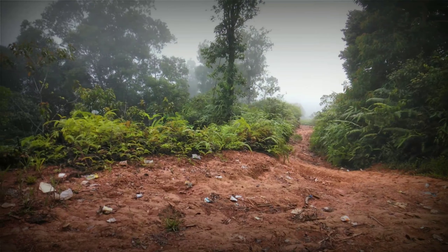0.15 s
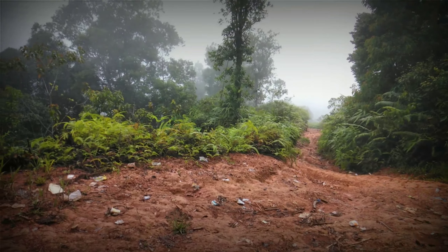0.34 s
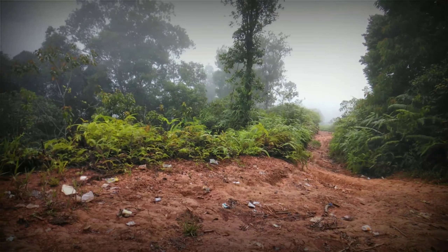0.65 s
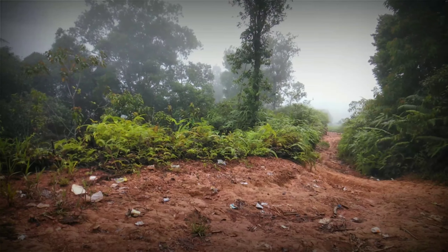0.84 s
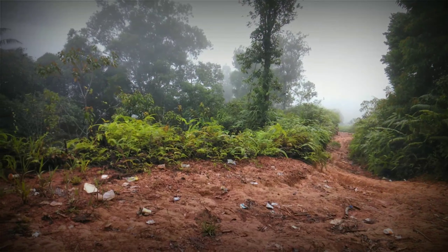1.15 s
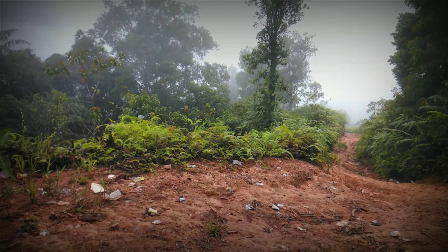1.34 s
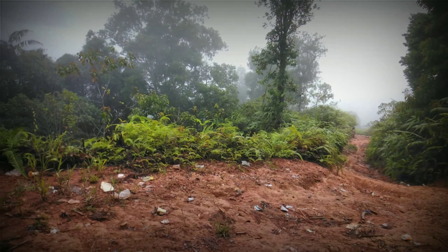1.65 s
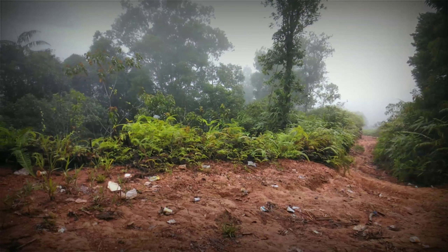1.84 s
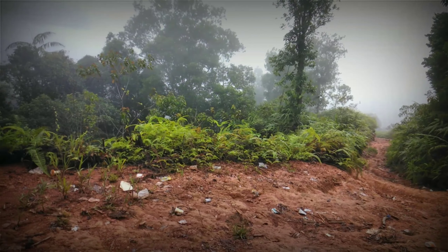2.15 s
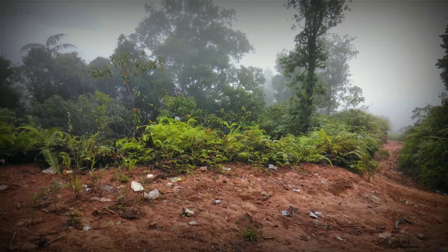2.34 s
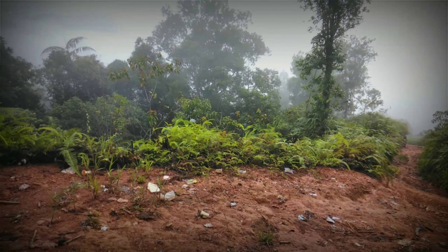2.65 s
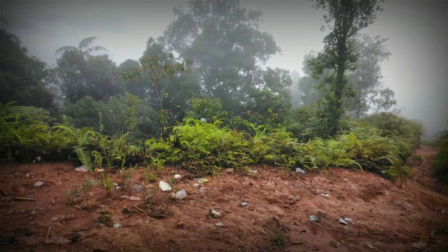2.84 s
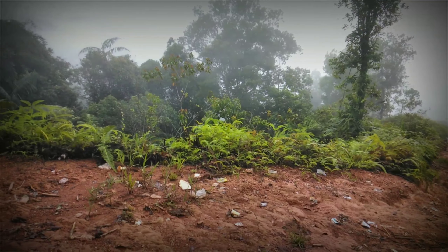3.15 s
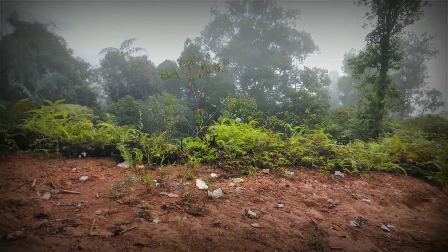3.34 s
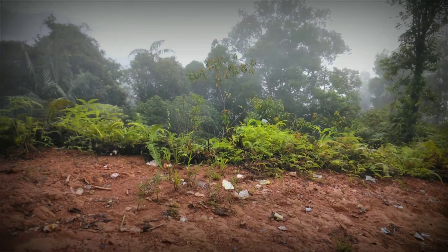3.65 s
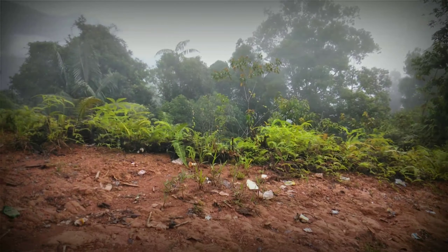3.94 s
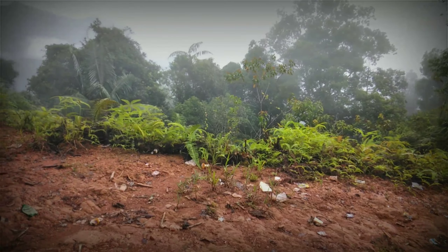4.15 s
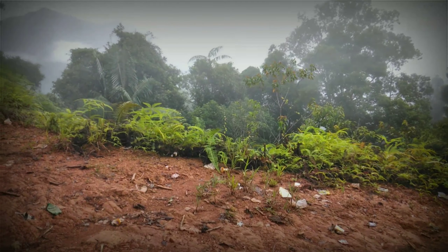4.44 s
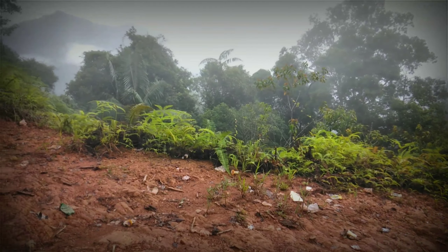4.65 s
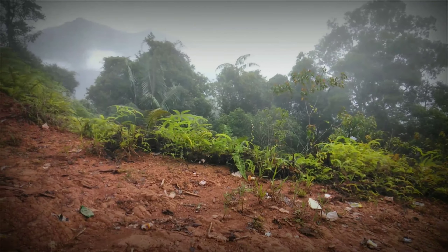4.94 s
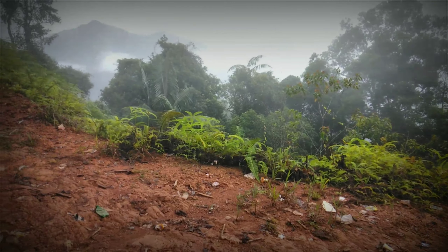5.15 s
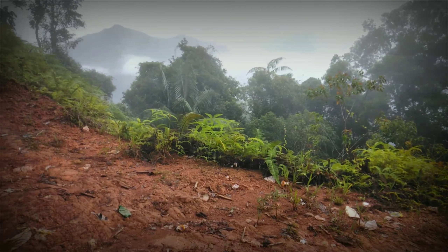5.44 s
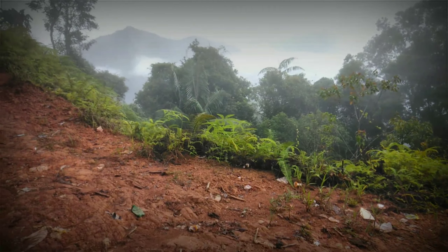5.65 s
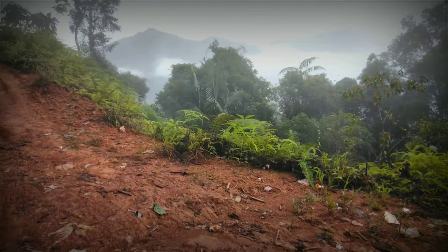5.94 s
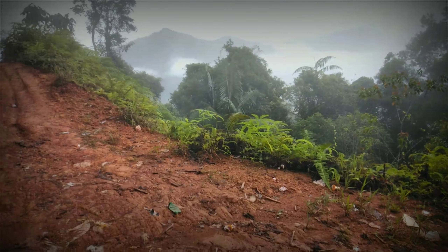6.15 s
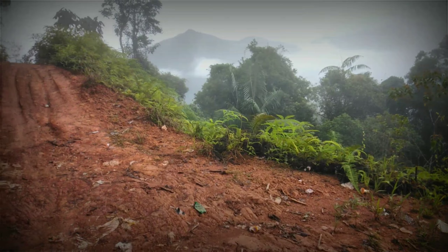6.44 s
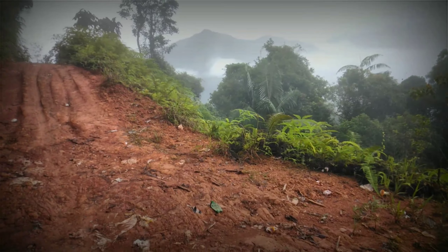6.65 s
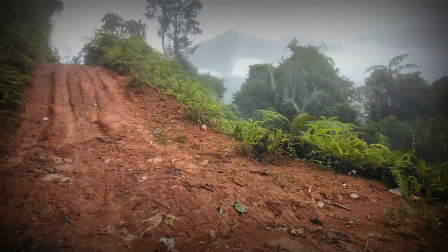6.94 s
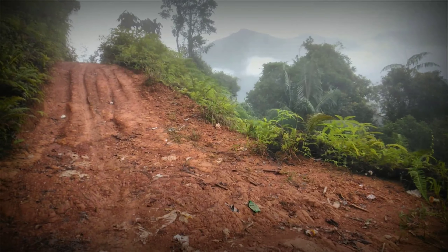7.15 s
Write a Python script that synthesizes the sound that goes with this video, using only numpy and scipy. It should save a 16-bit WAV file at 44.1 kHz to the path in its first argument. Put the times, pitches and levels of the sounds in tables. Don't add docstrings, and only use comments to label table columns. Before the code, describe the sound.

A misty tropical clearing, heard through a slowly turning microphone. Throughout, soft wind and low valley air lie under a dense high insect hiss, with faint shuffling of feet and clothes. One cricket gives paired chirps falling from about 4.2 kHz, nearly five calls a second; another trills near 6.7 kHz, growing strongest around 5 s. A katydid's double clicks near 15 kHz, about 26 a second, start faint, strengthen by 1.2 s and stand out from 5 s. A leaf brushes at 0.1 s; drops tick dully on soil and brightly on leaves. A distant, echoing bird whistles upward at 1.0-1.4 s. Thin breathy calls rise at 2.8 and 3.3 s. At 5.5 s a nearer bird peeps, with low answers to 5.85 s. Gravel crunches at 5.6 s and, longer, 6.5 s, with stone cracks. The wheezy call returns at 7.1 s, cut off at 7.3 s.

```python
import sys
import numpy as np
from scipy import signal
from scipy.fft import rfft, irfft, next_fast_len
from scipy.io import wavfile

SR = 44100
rng = np.random.default_rng(int(sys.argv[2]) if len(sys.argv) > 2 else 0)


def persist_wave(psi):
    counts = np.round(np.clip(psi, -1, 1) * 32767).astype(np.int16)
    wavfile.write(sys.argv[1], SR, np.atleast_2d(counts).T)


def to_linear_factor(level_db):
    exponent = np.asarray(level_db, float) / 20
    return 10 ** exponent


N = 321481
TIME = np.arange(N) / SR


def rms_one(x):
    return x / np.sqrt(np.mean(x ** 2) + 1e-20)


def colour(x, spectrum):
    size = next_fast_len(N)
    hz = np.fft.rfftfreq(size, 1 / SR) + 1e-3
    at_hz, db = np.transpose(spectrum)
    gain_db = np.interp(np.log(hz), np.log(at_hz), db, -99, -99)
    return irfft(rfft(x, size) * to_linear_factor(gain_db), size)[:N]


def halves(x):
    split_hz = 14000
    low = colour(x, [(20, 0), (split_hz - 400, 0), (split_hz + 600, -20)])
    return low, x - low


def drift(hz):
    r = np.exp(-2 * np.pi * hz / SR)
    noise = rng.standard_normal(N + SR)
    return rms_one(signal.lfilter([1], [1, -2 * r, r * r], noise)[SR:])


def level_at(rows, s):
    return np.interp(s, *np.transpose(rows))


def envelope(rows):
    rows = np.array(rows)
    return to_linear_factor(np.interp(TIME, rows[:, 0], rows[:, -1], -140, -140))


def add(out, s, piece):
    i = round(s * SR)
    out[max(i, 0):i + len(piece)] += piece[max(-i, 0):max(N - i, 0)]


def every(anchors, count):
    s, db = np.transpose(anchors)
    k = np.arange(count * len(s)) / count
    times = np.interp(k, np.arange(len(s) + 1), np.append(s, 2 * s[-1] - s[-2]))
    return times, np.interp(times, s, db)


def glide(rows):
    s, hz, db = np.transpose(rows)
    t = np.arange(s[0], s[-1], 1 / SR)
    phase = 2 * np.pi * np.cumsum(np.interp(t, s, hz)) / SR
    return np.sqrt(2) * to_linear_factor(np.interp(t, s, db)) * np.sin(phase)


def forest(x, t60, wet_db):
    t = np.arange(round(.8 * SR)) / SR
    tail = rng.standard_normal(len(t)) ** 3 * to_linear_factor(-60 * t / t60) * (t > .004)
    return x + to_linear_factor(wet_db) * signal.fftconvolve(x, tail / np.sqrt(np.sum(tail ** 2)))[:N]


def choir(spectrum, per_s, size_db, flicker_db):
    struck = rng.random(N) < per_s / SR
    sizes = to_linear_factor(size_db * np.minimum(rng.exponential(1, N), 4))
    strokes = struck * sizes * rng.standard_normal(N)
    return rms_one(colour(strokes, spectrum) * to_linear_factor(flicker_db * drift(16.7)))


def shifting():
    # start_s, peak_db, dying_s (to fall 10 dB)
    shift_rows = [(0.0, -46, .03), (0.3, -52, .03), (0.34, -52, .07), (0.57, -49, .08), (1.44, -58, .1),
                  (2.11, -58, .1), (2.6, -54, .04), (2.66, -52, .04), (3.02, -56, .2), (3.53, -50, .1),
                  (3.8, -54, .06), (4.69, -55, .1), (5.625, -43, .04), (5.85, -57, .2), (6.52, -51, .15),
                  (6.8, -49, .03)]
    attack_s, fidget_db = .02, -60.5
    db = [peak_db - 10 * np.maximum((s - TIME) / attack_s, (TIME - s) / dying_s)
          for s, peak_db, dying_s in shift_rows]
    return to_linear_factor(np.maximum(np.max(db, axis=0), fidget_db))


def air():
    # hz, db_per_hz
    air_hz_db = [(4, 9), (12, 0), (30, -8), (60, -14.5), (110, -17), (150, -14.5), (210, -21), (260, -27),
                 (700, -30.5), (1200, -29.5), (3000, -33), (5000, -43), (9000, -35.5), (16000, -38.5)]
    shuffle_hz_db = [(130, -19), (300, -1.5), (700, 3.5), (1500, -6.5), (3000, -8.5), (5000, -20)]
    shuffle = choir(shuffle_hz_db, 2500, size_db=1.5, flicker_db=2.0)
    wind = rms_one(colour(rng.standard_normal(N), air_hz_db))
    return to_linear_factor(-45) * wind + to_linear_factor(-1.5) * shifting() * shuffle


def choruses():
    # hz, db_per_hz
    low_hz_db = [(2120, -87), (3600, -18), (4000, -6), (4150, -5), (4260, 0), (4380, -6), (4700, -13),
                 (5000, -43), (6500, -23), (11000, -120)]
    mid_hz_db = [(2880, -57), (5220, -18.5), (5520, -10), (6610, 1.5), (7090, -13), (7220, -18),
                 (7290, -21), (7600, -25), (9880, -71), (16700, -120)]
    high_hz_db = [(10500, -30), (11700, -24), (12500, -15), (13500, -11), (14500, -5), (15200, -1),
                  (16000, 1)]
    buzz_hz_db = [(7700, -18), (7950, -7), (8200, -4), (8290, 0), (8380, -6), (8550, -16)]
    # at_s, level_db
    buzzer_rows = [(0, -65), (.4, -71), (.9, -70), (1.6, -60), (2.9, -57), (3.6, -59), (4.6, -73),
                   (5.1, -75), (6.2, -60), (7.29, -61)]
    hiss_rows = [(0, -39), (.6, -41), (1.5, -38), (2.1, -38), (2.55, -36.5), (3, -39.5), (4, -39.5),
                 (4.6, -41.5), (5.5, -40), (6.5, -38.3), (7.29, -39.5)]
    low_db = -59.2 - .3 * (TIME - TIME.mean())
    low = to_linear_factor(low_db + 2.0) * choir(low_hz_db, 5000, size_db=-0.5, flicker_db=1.8)
    mid = to_linear_factor(2.0 - 45.8) * choir(mid_hz_db, 6000, size_db=-1.0, flicker_db=0.32)
    body, top = halves(choir(high_hz_db, 7000, size_db=1.8, flicker_db=1.0))
    katydids = to_linear_factor(-2.5) * (to_linear_factor(-37.6) * body + envelope(hiss_rows) * top)
    throb = 1 + 0.16 * np.cos(2 * np.pi * 69.0 * TIME)
    buzzer = choir(buzz_hz_db, 9000, size_db=1.5, flicker_db=.3)
    return low + mid + to_linear_factor(-3.5) * envelope(buzzer_rows) * throb * buzzer + katydids


def leaf():
    # at_s, level_db
    rustle_rows = [(.09, -80), (.11, -51), (.15, -52), (.18, -80)]
    hiss = choir([(5000, -15), (8000, 0), (14000, -6)], 5000, size_db=3.5, flicker_db=-2.0)
    return envelope(rustle_rows) * hiss


def taps(table, cycles):
    out, t = np.zeros(N), np.arange(round(.03 * SR)) / SR
    for s, db, hz in table:
        decay = to_linear_factor(db + 8.5 - 60 * t * hz / cycles)
        contact = 1 - np.exp(-2 * t * hz)
        add(out, s, decay * contact * np.sin(2 * np.pi * hz * t))
    return out


def drops():
    # start_s, peak_db, pitch_hz
    soil_rows = [(0.3, -29.5, 810), (0.301, -36, 400), (0.322, -38, 190), (0.329, -45, 694),
                 (0.473, -35, 783), (0.523, -29, 560), (0.554, -35, 923), (0.584, -42, 522),
                 (2.089, -40, 770), (2.442, -45, 703), (2.735, -42, 765), (3.528, -40, 477),
                 (4.588, -42, 660), (4.692, -36, 626), (5.188, -43, 735), (5.874, -36, 836),
                 (5.992, -36.5, 608)]
    leaf_rows = [(0.5797, -40, 1726), (1.3287, -38, 2270), (1.7649, -45, 2480), (2.0323, -36, 2600),
                 (2.4425, -45, 1430), (2.5872, -43, 1900), (2.6254, -46, 1410), (2.6537, -41, 1300),
                 (2.6538, -41, 2250), (3.969, -42, 1400), (4.2822, -43, 2390), (4.5291, -42, 2580),
                 (4.5914, -38, 2450), (4.8548, -38, 1610), (4.8944, -41, 2250), (5.255, -42, 1380),
                 (5.3148, -34.5, 2950), (5.5858, -41, 1340), (5.8027, -43, 2520), (5.992, -37.5, 2740),
                 (6.2418, -41, 1930), (6.6495, -36, 2400), (6.6604, -36, 3000), (6.7057, -39, 2160),
                 (6.732, -38, 3000), (6.739, -37, 2170), (6.7425, -41, 1900), (6.7746, -41, 2300),
                 (6.808, -41, 2160), (6.9347, -45, 2060)]
    return forest(taps(soil_rows, 3.5) + taps(leaf_rows, 7.5), t60=0.092, wet_db=-4)


def stones():
    # start_s, peak_db, pitch_hz
    first_rows = [(5.6143, -36, 1360.0), (5.621, -30, 1610.0), (5.628, -30, 1700.0), (5.6337, -29, 1920.0),
                  (5.6379, -31, 1290.0), (5.643, -26, 2480.0), (5.6468, -32, 2580.0), (5.6515, -31, 4050.0),
                  (5.6567, -37, 2110.0), (5.6623, -28, 2260.0), (5.6693, -31, 2820.0),
                  (5.6738, -36, 2070.0)]
    second_rows = [(6.5145, -32, 2300.0), (6.5238, -34, 2480.0), (6.5307, -32, 2170.0),
                   (6.5357, -34, 2050.0), (6.5417, -31, 1980.0), (6.5473, -35, 2730.0),
                   (6.5532, -36, 2090.0), (6.5582, -32, 1770.0), (6.5638, -36, 2390.0),
                   (6.5694, -36, 1830.0), (6.5743, -34, 2930.0), (6.5918, -35, 1640.0)]
    rows = np.add(first_rows + second_rows, [0, -2.0, 0])
    return forest(taps(rows, 9), t60=0.092, wet_db=-4)


def gravel():
    # start_s, pressing_s, level_db, hollow_share (0-1), lift_off_s
    step_rows = [
        (5.62, .05, -41.5, .27, .014),
        (6.516, .078, -42.5, .42, .05),
    ]
    # hz, db_per_hz
    grit_hz_db = [(300, -29), (700, -2.5), (1700, 1.5), (2600, 2.5), (4500, 1.5), (7500, -4), (9500, -10),
                  (15000, -19)]
    hollow_hz_db = [(1300, -20), (1700, -3), (1850, 0), (2100, -4), (2600, -3), (3400, -14), (4000, -24)]
    attack_s, sag_db, settle_s = .014, -3.5, .05
    grit = choir(grit_hz_db, 8000, size_db=1.5, flicker_db=2)
    hollow = choir(hollow_hz_db, 2500, size_db=2.5, flicker_db=2)
    out = 0
    for s, pressing_s, db, share, lift_off_s in step_rows:
        end, share = s + pressing_s, np.clip(share, 0, 1)
        lifted = end + lift_off_s
        weight = envelope([(s - attack_s, db - 30), (s, db), (end, db + sag_db),
                           (lifted, db - 14), (lifted + settle_s, db - 30)])
        out = out + weight * ((1 - share) * grit + share * hollow)
    return to_linear_factor(6.0) * out


def whistler():
    # start_s, length_s, start_hz, end_hz, level_db
    note_rows = [
        (1.0, 0.015, 2400, 2450, -61),
        (1.034, 0.033, 2450, 2400, -59),
        (1.08, 0.092, 2600, 2733, -53),
        (1.175, 0.045, 2980, 3230, -47),
        (1.21, 0.044, 3200, 3210, -46),
        (1.24, 0.037, 3690, 3677, -45),
        (1.284, .045, 3820, 3700, -51),
        (1.358, 0.038, 3180, 3270, -41),
        (1.39, .03, 3363, 3440, -42.5),
        (1.402, .035, 3240, 3250, -53),
    ]
    out = np.zeros(N)
    for s, length, start_hz, end_hz, db in note_rows:
        add(out, s, glide([(0, start_hz, db - 18), (.006, start_hz, db),
                           (length - .005, end_hz, db), (length, end_hz, db - 18)]))
    husky = 1 + .38 * drift(60)
    return forest(out * husky, t60=.9, wet_db=0)


def wheezer():
    # at_s, pitch_hz, level_db
    call_rows = [
        [(2.78, 7500, -62), (2.81, 7700, -47), (2.845, 7980, -49), (2.92, 7900, -46), (2.97, 8200, -48),
         (3.03, 8400, -46), (3.06, 8700, -54), (3.1, 8800, -64)],
        [(3.27, 7200, -64), (3.32, 7550, -44), (3.36, 7650, -45.5), (3.4, 8020, -45), (3.45, 8250, -49),
         (3.49, 8200, -56), (3.53, 8100, -65)],
        [(7.13, 7200, -64), (7.17, 7550, -47), (7.22, 7750, -50), (7.29, 7940, -49)],
    ]
    out = np.zeros(N)
    for rows in call_rows:
        add(out, rows[0][0], glide(rows))
    breathy = .75 + .6 * drift(240)
    return forest(out * breathy, t60=0.51, wet_db=-9.5)


def peeper():
    # at_s, pitch_hz, level_db
    high_rows = [(5.524, 2790, -68), (5.535, 2820, -56), (5.563, 3070, -55), (5.573, 3100, -70)]
    # start_s, length_s, pitch_hz, level_db
    low_rows = [
        (5.712, .03, 2040, -62),
        (5.765, .032, 2020, -59),
        (5.828, .036, 2050, -56),
    ]
    out = np.zeros(N)
    add(out, high_rows[0][0], glide(high_rows))
    for s, length, hz, db in low_rows:
        add(out, s, glide([(0, hz, db - 15), (length / 4, hz, db),
                           (length * 3 / 4, hz, db), (length, hz, db - 15)]))
    return forest(out, t60=.3, wet_db=-8)


def chirpers():
    # first_s, last_s, period_s, pitch_hz, length_s
    chirper_rows = [(.78, 1.52, .1215, 6850, .03), (1.66, 2.96, .1285, 6830, .03),
                    (3.1, 3.5, .13, 6800, .036), (.04, 1.8, .064, 6970, .028),
                    (5.567, 6.36, .064, 7020, .028), (6.4, 7.28, .064, 7000, .028),
                    (1.72, 3.2, .062, 6560, .022), (2.676, 4.04, .1145, 4850, .013),
                    (2.703, 4.07, .1145, 4850, .013), (6.765, 6.77, .1, 7000, .026),
                    (6.793, 6.82, .021, 7210, .02)]
    chirper_db = [-46, -48, -43, -53, -50, -53, -51, -60, -58.5, -48, -47]
    out = np.zeros(N)
    for (first, last, period, hz, length), db in zip(chirper_rows, chirper_db):
        chirp = glide([(0, hz - 20, -20), (length / 4, hz, 0),
                       (length * 3 / 4, hz, 0), (length, hz - 20, -20)])
        for s, size in zip(np.arange(first, last, period), rng.standard_normal(40)):
            add(out, s - length / 2, to_linear_factor(db + 2 * size) * chirp)
    return forest(out, t60=.2, wet_db=-6)


def triller():
    # start_s, level_db
    trill_rows = [(0.0984, -63), (0.7223, -60), (1.3387, -45), (1.9537, -45.5), (2.5672, -43),
                  (3.1788, -42), (3.7933, -40.5), (4.4103, -37.5), (5.0263, -36.5), (5.6413, -37.5),
                  (6.2627, -40), (6.8834, -42)]
    out, (times, db) = np.zeros(N), every(trill_rows, count=10)
    chance = rng.standard_normal((len(times), 2))
    for s, level_db, own in zip(times, db, chance):
        for lag_s, hz, own_db, size in zip((0, .0133), (6705, 6770), (-2, .5), own):
            pulse = glide([(-.005, hz - 50, -24), (-.002, hz, -1), (.002, hz + 10, 0), (.007, hz - 20, -24)])
            add(out, s + lag_s - .005, to_linear_factor(level_db + own_db + 1.6 * size - 1.5) * pulse)
    return forest(out, t60=.2, wet_db=-8)


def low_cricket():
    # start_s, wait_s (to the next call), level_db
    pair_rows = [(0.003, .205, -41), (0.418, .213, -40), (0.836, .223, -38.5), (1.268, .216, -38),
                 (1.696, .21, -39.5), (2.125, .221, -41), (2.562, .209, -42.5), (2.986, .219, -45.5),
                 (3.414, .216, -47.5), (3.848, .22, -43.5), (4.287, .22, -43.5), (4.719, .209, -46),
                 (5.148, .207, -49.5), (5.567, .216, -48.5), (5.992, .221, -48.5), (6.438, .215, -47),
                 (6.865, .221, -44.5)]
    # at_s, pitch_hz, level_db, lift_share (0-1)
    stroke_rows = [(-.013, 4190, -26, 0), (-.008, 4180, -4, .7), (.001, 4170, 0, 1), (.006, 4135, 0, .75),
                   (.011, 4000, -1, .05), (.015, 3930, 2, 0), (.021, 3830, -1, 0), (.026, 3750, -24, 0)]
    # at_s, lift_db
    lift_rows = [(0, 17), (1.8, 14), (2.3, 13.5), (3.2, 7), (4.1, 9), (5, 6.5), (6.2, 9.5), (7.29, 9.5)]
    out, (at, hz, db, share) = np.zeros(N), np.transpose(stroke_rows)
    first, wait, levels = np.transpose(pair_rows)
    calls = np.sort(np.append(first, first + wait))
    chance = rng.standard_normal((len(calls), 2, 2))
    for s, level_db, strokes in zip(calls, np.interp(calls, first, levels), chance):
        lift_db = level_at(lift_rows, s)
        for lag_s, own_db, (off, size) in zip((0, .042), (0, -.6), strokes):
            stroke = glide(np.transpose([at, hz + 14 * off, db + (share - 1) * lift_db]))
            add(out, s + lag_s + at[0], to_linear_factor(level_db + .7 + own_db + .8 * size) * stroke)
    return forest(out, t60=.3, wet_db=-10)


def katydid():
    # start_s, peak_db
    snap_rows = [(0.0655, -41), (0.4512, -41), (0.8388, -36), (1.2227, -26.5), (1.6067, -26), (1.992, -27),
                 (2.3829, -25), (2.7667, -25), (3.1534, -27), (3.5404, -26), (3.9271, -26), (4.317, -29.5),
                 (4.7003, -27.5), (5.0848, -26), (5.4745, -26.5), (5.8557, -24.5), (6.2432, -24),
                 (6.6311, -23.5), (7.0208, -23)]
    # start_s, peak_db, second_db (re first click)
    near_rows = [(4.9692, -26.2, -1.9), (5.008, -26.4, -1.9), (5.0459, -25.8, -4.2), (5.0851, -25.8, -2.1),
                 (5.1222, -23.5, -2.6), (5.1638, -29.5, -1.5), (5.2015, -26.1, -4.4), (5.2421, -27.4, -6.0),
                 (5.28, -25.1, -5.7), (5.3206, -30.0, -1.9), (5.358, -24.5, -7.9), (5.397, -24.7, -6.5),
                 (5.4352, -24.7, -8.1), (5.4754, -23.9, -9.2), (5.5132, -23.4, -6.2), (5.553, -24.5, -6.4),
                 (5.5905, -22.9, -7.3), (5.6295, -26.5, -3.2), (5.6662, -23.6, -2.9), (5.7035, -22.7, -5.7),
                 (5.7418, -22.4, -5.4), (5.7795, -23.2, -3.1), (5.8169, -22.3, -1.9), (5.8557, -22.9, -1.8),
                 (5.8946, -22.0, -1.5), (5.9346, -25.7, -0.8), (5.9719, -21.7, -0.6), (6.0101, -22.5, -1.3),
                 (6.049, -23.5, 1.6), (6.0887, -22.0, 0.5), (6.127, -21.5, -1.2), (6.1656, -22.1, -0.4),
                 (6.204, -22.2, -0.9), (6.2437, -20.1, -0.3), (6.2818, -26.3, -2.1), (6.3211, -19.0, -2.0),
                 (6.3592, -21.5, -5.0), (6.3986, -26.6, -5.5), (6.4369, -22.0, -4.1), (6.4769, -24.7, -6.0),
                 (6.5149, -22.4, -5.9), (6.555, -26.1, -6.6), (6.5929, -21.4, -7.1), (6.6311, -23.1, -7.8),
                 (6.6695, -25.9, -5.8), (6.709, -19.2, -8.1), (6.7477, -19.3, -4.9), (6.7863, -26.4, -1.1),
                 (6.8242, -22.1, -6.6), (6.8643, -20.4, -1.3), (6.9027, -22.3, -5.8), (6.9421, -26.8, -0.3),
                 (6.9799, -22.7, -2.9), (7.02, -25.6, -2.0), (7.0576, -20.8, -2.5), (7.0981, -25.2, -3.6),
                 (7.1367, -21.7, -4.8), (7.1774, -19.1, -2.0), (7.2158, -20.9, -4.0), (7.2542, -21.4, -5.1)]
    accent_s = [3.888, 4.778, 4.892]
    # hz, db_per_hz
    snap_hz_db = [(10000, -20), (11500, -2), (12900, 2), (14300, -2), (15500, 0), (17000, 0)]
    # at_s, level_db
    body_rows = [(0, -7), (2.2, -6), (3.7, -4), (4.5, 3), (5, 1.5), (5.9, 1.5), (6.3, 2.5), (7, 1)]
    jitter_s, spread_db, accent_db, rattle_db = .0005, 1.1, 3, -10
    snaps, (times, db) = np.zeros(N), every(snap_rows, count=10)
    chance = rng.standard_normal((len(times), 4))
    accented = np.abs(times[:, None] - accent_s).argmin(axis=0)
    chance[accented] = [accent_db / spread_db, 0, 0, 1]
    big, tones, late, second = chance.T
    rows = np.transpose([times + jitter_s * late, db + spread_db * big, -3 + 2.5 * second])
    far_rows = rows[times < near_rows[0][0] - .02]
    rows = np.vstack([far_rows, np.add(near_rows, [0, -.7, 0])])
    t = np.arange(-40, 80) / SR
    for (s, level_db, second_db), tone in zip(rows, tones):
        for lag_s, own_db, width_s in ((0, 0, .00011), (.00172 + .00004 * tone, second_db, .00014)):
            shape = np.exp(-(t / width_s) ** 2) + .3 * (t > 0) * np.exp(-t / .0008)
            click = shape * np.sin(2 * np.pi * (15200 + 250 * tone) * t)
            add(snaps, s + lag_s + t[0], to_linear_factor(level_db + own_db) * click)
            add(snaps, s + lag_s + .0008 + t[0], to_linear_factor(level_db + own_db + rattle_db) * click)
    body, top = halves(colour(snaps, snap_hz_db))
    snaps = to_linear_factor(level_at(body_rows, TIME)) * body + top
    snaps = snaps + to_linear_factor(-13) * np.roll(snaps, round(.0079 * SR))
    return to_linear_factor(4.6) * forest(snaps, t60=.1, wet_db=-12)


def scene():
    ground = air() + leaf() + drops() + stones() + gravel()
    birds = whistler() + wheezer() + peeper()
    insects = choruses() + chirpers() + triller() + low_cricket() + katydid()
    return (ground + birds + insects)[None]


def low_pass(x):
    return signal.sosfilt(signal.butter(12, 16810, fs=SR, output="sos"), x)


def record(dry):
    steep = signal.ellip(10, .25, 31, 15490, fs=SR, output="sos")
    mix = signal.sosfiltfilt(steep, dry)
    return low_pass(mix)


dry = scene()
out = record(dry)
persist_wave(out)
```